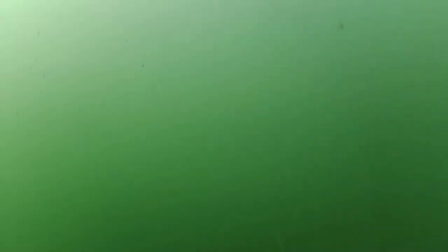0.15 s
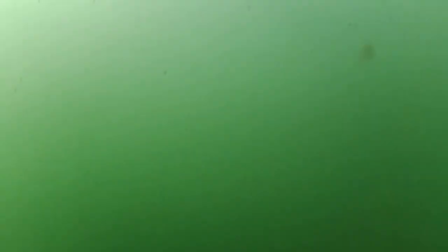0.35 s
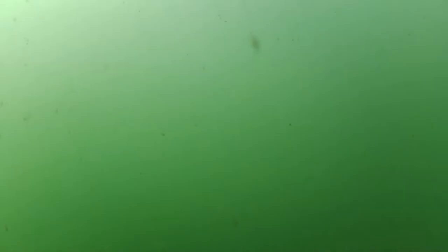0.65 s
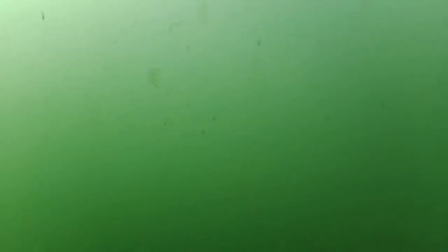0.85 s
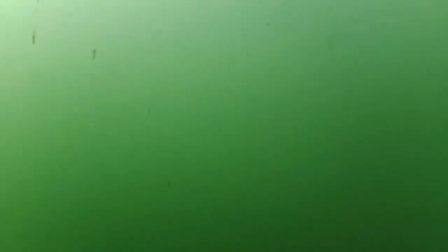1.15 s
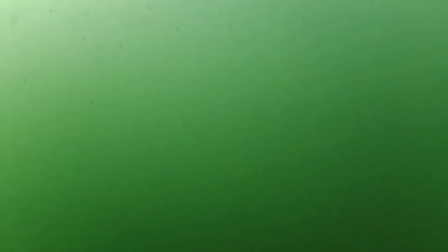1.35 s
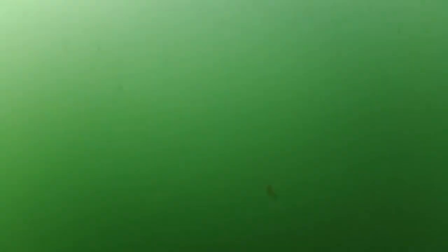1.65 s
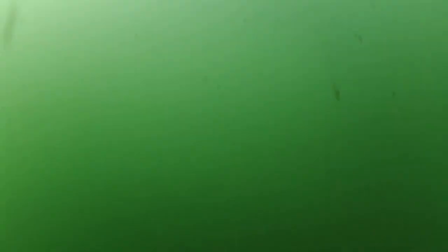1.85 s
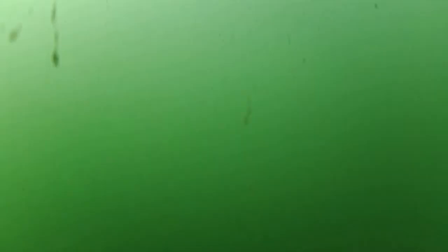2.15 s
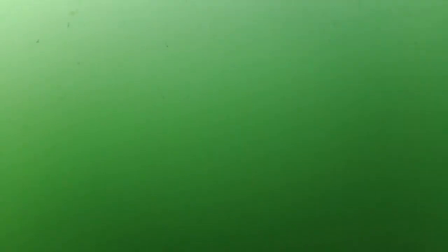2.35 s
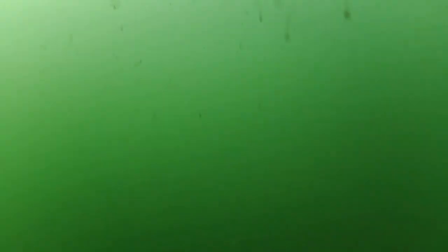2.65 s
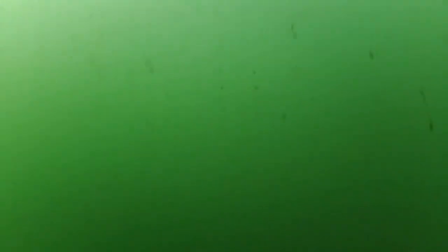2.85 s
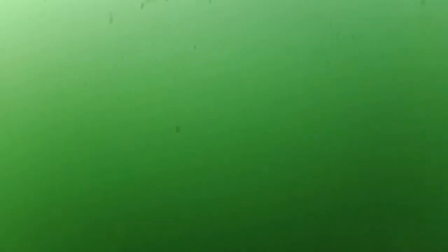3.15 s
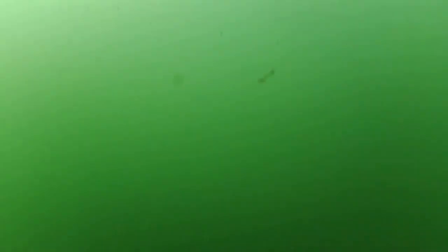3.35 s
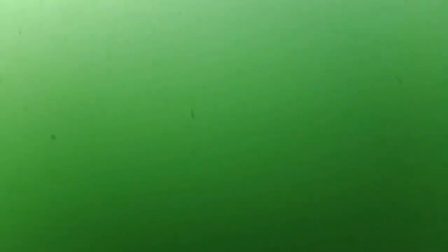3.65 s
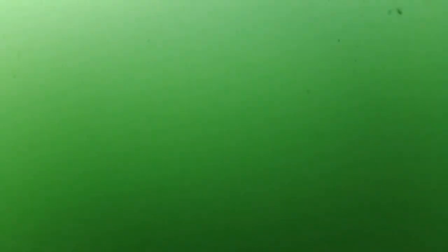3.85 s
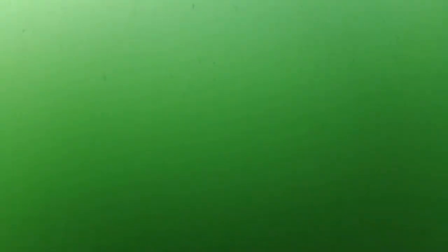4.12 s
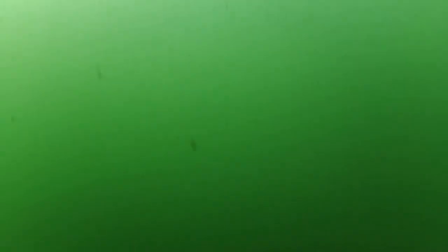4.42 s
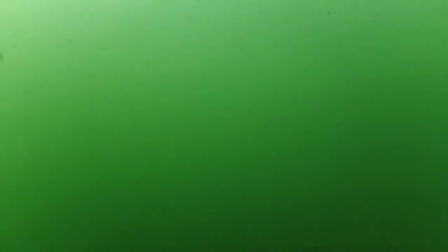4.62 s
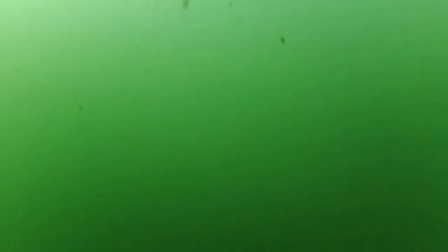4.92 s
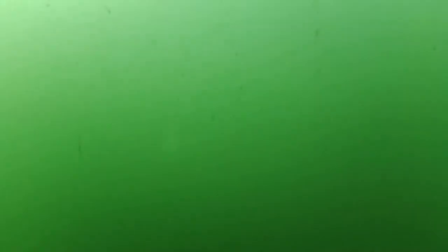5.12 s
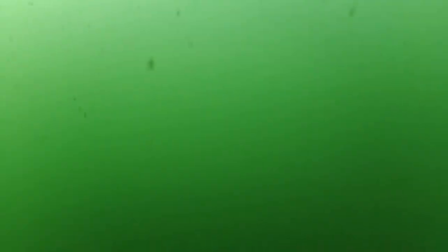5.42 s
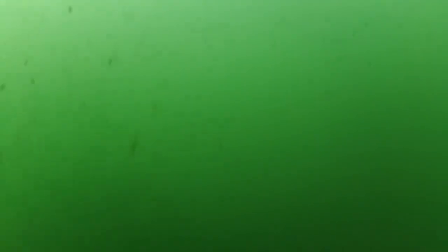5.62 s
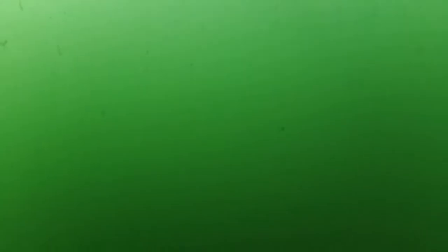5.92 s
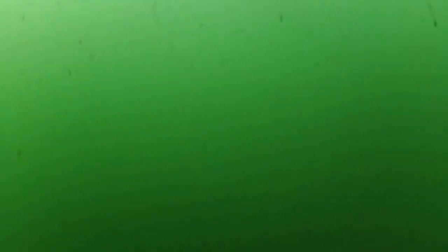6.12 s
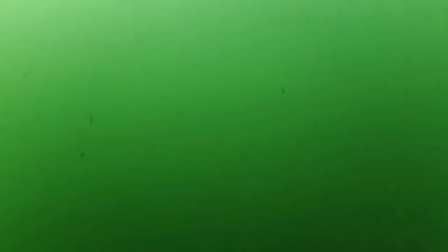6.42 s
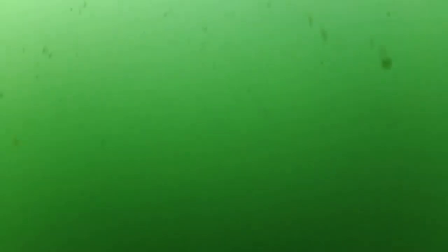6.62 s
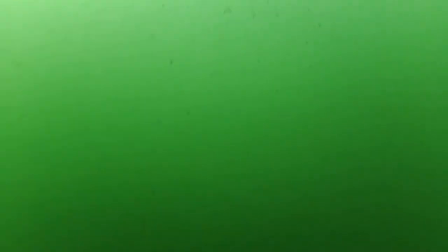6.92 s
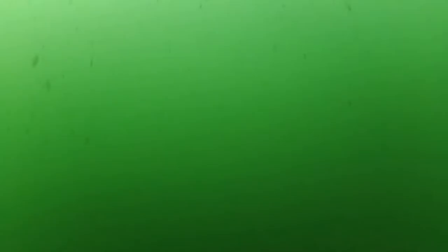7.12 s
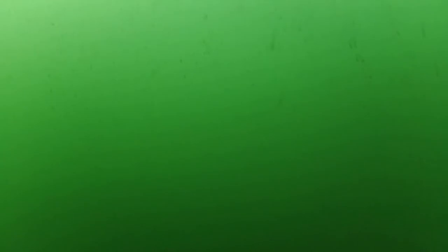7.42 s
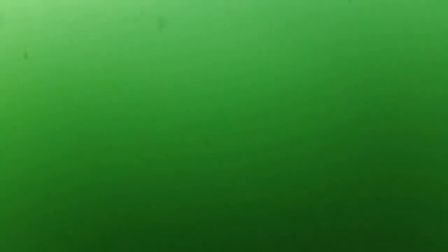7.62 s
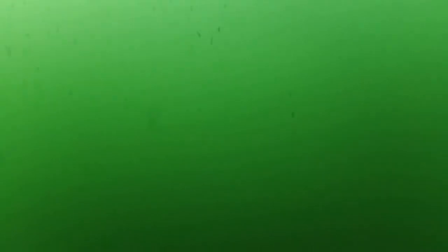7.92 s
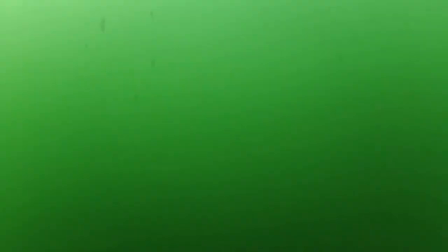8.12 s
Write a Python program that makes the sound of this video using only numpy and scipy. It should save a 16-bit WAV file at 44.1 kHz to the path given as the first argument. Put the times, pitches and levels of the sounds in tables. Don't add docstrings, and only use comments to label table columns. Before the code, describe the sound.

Underwater, a muffled motor hum and a faint wavering whistle give way to dense hollow knocking and rattling of a towed plastic housing.

```python
import sys
import numpy as np
from scipy import signal
from scipy.fft import rfft, irfft, next_fast_len
from scipy.io import wavfile
from scipy.ndimage import uniform_filter1d, map_coordinates

SR = 44100
rng = np.random.default_rng(int(sys.argv[2]) if len(sys.argv) > 2 else 0)


def magnitude_from_level(level_db):
    exponent = np.asarray(level_db, float) / 20
    return 10 ** exponent


def log_audio(samples):
    frames = np.atleast_2d(samples).T
    limited = np.clip(frames, -1, 1)
    pcm = np.round(limited * 32767).astype(np.int16)
    wavfile.write(sys.argv[1], SR, pcm)


N = 364521
TIME = np.arange(N) / SR


def unit(x):
    return x / np.sqrt(np.mean(x ** 2) + 1e-20)


def noise():
    return rng.standard_normal(N)


def wobble(rate):
    return map_coordinates(rng.standard_normal(int(N * rate / SR) + 4), [TIME * rate])


def curves(rows):
    s, *columns = np.transpose(rows)
    gate = np.clip(np.minimum(TIME - s[0], s[-1] - TIME) / .02 + 1, 0, 1)
    return [np.interp(TIME, s, column) for column in columns] + [gate]


def filtered(x, response):
    m = next_fast_len(N + SR // 2)
    return irfft(rfft(x, m) * response(np.fft.rfftfreq(m, 1 / SR)), m)[:N]


def ringing(x, modes, soft_hz, order=2):
    def response(f):
        body = 0
        for k, (center, width, db) in enumerate(modes):
            damping = 1j * f * width
            body = body + (-1) ** k * magnitude_from_level(db) * damping / (center * center - f * f + damping)
        return body / (1 + 1j * f / soft_hz) ** order
    impulse = np.arange(N) == 0
    return filtered(x, response) / np.max(np.abs(filtered(impulse, response)))


def blow_train(at, sizes):
    return np.bincount(at, sizes, N)[:N]


# frequency in Hz, density in dB per Hz.
HISS_SPECTRUM = [(300, 5.5), (5000, -7.5), (9000, -3), (15000, -4)]


def hiss():
    f, db = np.transpose(HISS_SPECTRUM)
    return unit(filtered(noise(), lambda hz: magnitude_from_level(np.interp(np.log(hz + 1), np.log(f), db))))


TURN_S = 5
# frequency in Hz, width in Hz, level in dB.
LATE_EDGES = [(1367, 52, -1.5), (1634, 160, -3), (1976, 38, -3), (2380, 39, -11.5), (3000, 250, -32.5),
              (3840, 300, -23), (4800, 440, -37), (5280, 110, -36), (6250, 220, -37), (7600, 500, -41)]


def edges(x, early):
    late = np.clip((TIME - TURN_S) / 0.12, 0, 1)
    before = ringing(x * (1 - late), early, soft_hz=4050)
    return before + magnitude_from_level(-4.5) * ringing(x * late, LATE_EDGES, soft_hz=4030)


# frequency in Hz, width in Hz, level in dB.
SHELL_MODES = [(88.6, 33, -19), (133.6, 21, -12.5), (153.7, 15, -5.5)]
# frequency in Hz, width in Hz, level in dB.
LID_MODE = [(338.6, 23.7, 0)]
# frequency in Hz, width in Hz, level in dB.
PANEL_MODES = [(588.6, 34.9, -1), (656, 51, -3), (792, 174, -14), (963.3, 80, -4.5), (1014.5, 103, -7)]
# frequency in Hz, width in Hz, level in dB.
ENGINE_WHINE = [(648, 22, -1.5), (983, 11, -0.5), (1343, 10, -15)]
# frequency in Hz, width in Hz, level in dB.
FLOW_EDGES = [(1274, 36, -8), (1855, 170, -5), (2240, 160, -10.5), (2800, 160, -14), (3400, 98, -15.5),
              (3770, 160, -17.5), (4700, 310, -16.5), (7400, 400, -38)]
# frequency in Hz, width in Hz, level in dB.
LATE_FLOW = [(2880, 150, -3), (3800, 130, -0.5), (5300, 160, -5), (6250, 200, -6), (7500, 250, -9.5)]
# time in seconds, level in dB, share of the shell in dB.
HUM_COURSE = [
    (0.0, -39, 2),
    (0.44, -42.5, 6),
    (2.71, -41, 1),
    (2.92, -48.5, 2.5),
    (4.21, -40.5, 0),
    (4.63, -53, -1),
    (4.83, -36.5, -4),
    (6.1, -40.5, 4),
    (6.95, -39, -4.5),
    (8.27, -41, -3),
]


def hum():
    def drive():
        return magnitude_from_level(2.5 * wobble(14) + 1.5 * wobble(45)) * noise()

    level_db, shell_db, _ = curves(HUM_COURSE)
    low = magnitude_from_level(-6) * unit(ringing(drive(), SHELL_MODES, soft_hz=400))
    low += magnitude_from_level(-9.5) * unit(ringing(drive(), LID_MODE, soft_hz=443))
    panels = magnitude_from_level(-2.5) * unit(ringing(drive(), PANEL_MODES, soft_hz=4000))
    panels += magnitude_from_level(-2) * unit(ringing(drive(), PANEL_MODES[2:], soft_hz=2900))
    whine = unit(ringing(noise(), ENGINE_WHINE, soft_hz=4000))
    panels += magnitude_from_level(-3.5 + 1.9 * wobble(8.8)) * whine
    flow = magnitude_from_level(-58.0) * unit(edges(magnitude_from_level(0.6 * wobble(22)) * noise(), FLOW_EDGES))
    flow += magnitude_from_level(-77) * (TIME > TURN_S) * unit(ringing(noise(), LATE_FLOW, soft_hz=9000))
    return magnitude_from_level(level_db + 1.1 * wobble(2.7)) * (magnitude_from_level(shell_db) * low + panels) + flow


# time in seconds, pitch in Hz.
LINE_GUSTS = [
    [(0, 1050), (.1, 1090), (.25, 730), (.35, 720), (.44, 630), (.6, 600), (.66, 830), (.78, 810),
     (.9, 620)],
    [(.93, 680), (.98, 890), (1.08, 1010), (1.14, 940), (1.5, 990), (1.61, 1170), (1.74, 930), (2.06, 940),
     (2.26, 560)],
    [(5.45, 860), (5.53, 1020), (5.6, 990), (5.66, 970), (5.7, 810), (5.735, 960), (5.79, 900), (5.83, 700),
     (5.93, 560)],
]


def tow_line():
    flutter_hz, flutter_share = 12, .045

    def fuzzy(phase):
        return (.7 + .9 * wobble(75)) * np.sin(phase) + .9 * wobble(90) * np.cos(phase)

    def lift(modes):
        return lambda f: sum(magnitude_from_level(db / 2) * w / np.hypot(f - c, w) for c, w, db in modes)

    tone, octave = np.zeros((2, N))
    for rows in LINE_GUSTS:
        hz, gate = curves(rows)
        flutter = flutter_share * np.sin(2 * np.pi * flutter_hz * TIME + wobble(3))
        bend = 1 + .014 * wobble(70) + .02 * wobble(22) + flutter
        phase = 2 * np.pi * np.cumsum(hz * bend) / SR
        tone += gate * fuzzy(phase)
        octave += gate * fuzzy(2 * phase)
    lifted_octave = filtered(octave, lift([(1380, 150, 2), FLOW_EDGES[1]]))
    return magnitude_from_level(-53) * filtered(tone, lift(PANEL_MODES)) + magnitude_from_level(-59.5) * (.7 * octave + lifted_octave)


# start in seconds, peak in dB, pitch in Hz.
MOUNT_TICKS = [
    (1.4513, -47, 7700),
    (2.601, -42, 6330),
    (5.2465, -57, 6050),
    (5.5586, -45, 7640),
    (5.5725, -41, 8200),
    (6.8629, -41, 6300),
]


def ticks():
    out, t = np.zeros(N + SR), np.arange(SR // 50) / SR
    for s, db, hz in MOUNT_TICKS:
        envelope = (1 - np.exp(-t / 0.00065)) * magnitude_from_level(-60 * t / 0.019)
        puff = envelope * rng.standard_normal(len(t))

        def band(center, width):
            return signal.lfilter(*signal.iirpeak(center, center / width, SR), puff)

        snap = band(hz, 900) + 0.61 * band(5000, 1500) + .9 * band(3500, 1200) + 0.14 * band(9500, 3700)
        out[round(s * SR):][:len(t)] += magnitude_from_level(db - 0.5) * snap / np.max(np.abs(snap))
    return out[:N]


FULL_SHAKE_DB = -20
# frequency in Hz, width in Hz, level in dB.
EDGE_MODES = [(1316, 24, 1), (1646, 220, -6), (2003, 93, -2.5), (2327, 54, -7.5), (3060, 280, -24),
              (3880, 130, -18.5), (4600, 270, -32), (6040, 300, -40.5)]
# time in seconds, level in dB.
SHAKE = [(2.22, -39), (2.3, -25.5), (2.65, -23), (2.68, -39), (2.74, -19.5), (4.41, -19), (4.47, -33),
         (4.65, -37), (4.68, -16.5), (5.03, -22), (5.31, -31), (5.42, -51.5), (5.72, -44), (6.27, -37.5),
         (6.48, -23.5), (7.33, -20.5), (7.93, -26.5), (8.27, -24)]


def rattle():
    shake_db, gate = curves(SHAKE)
    contact = rng.random(N) < 240 / SR * magnitude_from_level(5 * wobble(35))
    size = contact * magnitude_from_level(4.5 * noise())

    def blows():
        return size * rng.choice([-1, 1], N) * magnitude_from_level(0.87 * noise())

    body = magnitude_from_level(1.5) * unit(ringing(blows(), LID_MODE, soft_hz=690, order=4))
    body += magnitude_from_level(-0.5) * unit(ringing(blows(), PANEL_MODES, soft_hz=1840, order=5))
    body += magnitude_from_level(1.5) * unit(ringing(blows(), SHELL_MODES, soft_hz=257))
    scrape = unit(blows()) + 0.32 * magnitude_from_level(7 * wobble(50)) * noise()
    grit_db = -19.5 + 0.2 * (shake_db - FULL_SHAKE_DB)
    grit = magnitude_from_level(grit_db - 3.5) * unit(edges(scrape, EDGE_MODES))
    return gate * magnitude_from_level(shake_db - 4.5) * (body + grit)


AFTER_CONTACTS = 9
# start in seconds, shell level in dB, panel level in dB, brightness in dB.
STRAYS = [(0.048, -29, -20, -14), (0.363, -16.5, -6.5, -3.5), (1.459, -28, -17, 3.5),
          (2.623, -15, -11.5, 1), (4.611, -5.5, -16.5, -1), (5.277, -20, -17.5, 1), (5.336, -13, -12, 0.5),
          (5.762, -27, -16.5, 0.5), (5.852, -20, -16.5, 3.5), (5.879, -17.5, -15.5, -1.5),
          (5.943, -19, -13.5, 3.5), (5.99, -24.5, -11, 0.5), (6.102, -23, -15.5, 0.5),
          (6.222, -20.5, -17, 4), (8.253, -16, -12.5, -4), (6.244, -12.5, -12, 1)]
# start in seconds, shell level in
# dB, panel level in dB, brightness in dB.
LEADING_BLOWS = [(2.268, -15.5, -14.5, 2), (2.358, -11.5, -18, -3), (2.406, -11, -13.5, 2.5),
                 (2.498, -11, -10.5, -2), (2.543, -10.5, -7, -4), (2.718, -6, -13.5, -9.5),
                 (2.768, -8.5, -9.5, 2), (2.865, -14.5, -8.5, 3.5), (2.982, -6.5, -9, 4),
                 (3.094, -7, -10.5, 1), (3.14, -14, -10, -3), (3.209, -16.5, -15, -1.5), (3.332, -6, -19, -1),
                 (3.411, -8, -9.5, 3), (3.459, -16, -9, 1.5), (3.537, -5.5, -8, -2), (3.656, -4.5, -10, -3),
                 (3.762, -12.5, -14, -1), (3.913, -8, -12.5, 2.5), (4.008, -6.5, -9.5, -1.5),
                 (4.122, -5.5, -11.5, -1.5), (4.251, -3.5, -13.5, -6), (4.343, -12, -10.5, -1),
                 (4.434, -7.5, -10.5, 1.5), (4.547, -8.5, -7, -2.5), (4.671, -19, -11, 0.5),
                 (4.808, -3, -12, -3.5), (4.917, -8.5, -12, 3.5), (5.066, -9.5, -10, 1),
                 (5.14, -12, -11, 1.5),
                 (6.337, -8, -10.5, 1), (6.42, -21, -11.5, 2.5), (6.464, -21, -14.5, 4),
                (6.54, -12.5, -14.5, 1.5), (6.619, -10, -13.5, 1), (6.662, -5, -12.5, 3),
                (6.802, -6.5, -9, 3), (6.885, -7, -10.5, 0.5), (6.935, -17, -13, 2), (6.992, -9.5, -10, 2),
                (7.08, -17.5, -12, -2.5), (7.15, -10, -10, 3), (7.188, -7.5, -10, 0),
                (7.218, -5.5, -10, 2.5), (7.249, -11.5, -8.5, 2), (7.275, -8, -11.5, 2.5),
                (7.363, -1.5, -11, 0.5), (7.41, -8, -6, -1.5), (7.462, -8.5, -8.5, 1),
                (7.559, -15, -21, -6), (7.601, -6, -11.5, 0.5), (7.683, -8, -12.5, -2),
                (7.706, -4.5, -12.5, 0), (7.817, -7, -10.5, -0.5), (7.937, -7.5, -13.5, -1.5),
                (8.01, -12.5, -22, -2.5), (8.067, -9, -10, -3.5), (8.121, -8, -11, -1),
                (8.158, -19, -13.5, -1), (8.207, -11, -16.5, 2.5)]


def contacts():
    rebound_s, spread = .047, .3
    shell_loss_db, panel_loss_db = 5.5, 3.5
    s, shell_db, panel_db, bright_db = np.transpose(LEADING_BLOWS)[..., None]
    turns = np.arange(3)
    order = np.sort(np.append(s, [row[0] for row in STRAYS] + [N / SR]))
    ahead = order[np.searchsorted(order, s, "right")]
    chance = rng.standard_normal((len(s), 8, len(turns)))
    at = s + rebound_s * turns * (1 + spread * np.tanh(chance[:, 0]) / 2)
    free = (at < ahead - rebound_s / 2) | (turns == 0)
    scatter = (turns > 0) * np.tanh(chance[:, 1:4])
    rows = np.stack([at,
                     shell_db - shell_loss_db * turns + 1.5 * scatter[:, 0],
                     panel_db - panel_loss_db * turns + 1.5 * scatter[:, 1],
                     bright_db + 2.5 * scatter[:, 2],
                     *np.moveaxis(chance[:, 4:], 1, 0)], -1)
    seed_count = 6 * AFTER_CONTACTS
    seeds = rng.random((len(s), len(turns), seed_count))
    spells = np.concatenate([rows, seeds], -1)[free]
    stray_chance = rng.standard_normal((len(STRAYS), 4))
    strays = np.hstack([STRAYS, stray_chance, rng.random((len(STRAYS), seed_count))])
    rows = np.vstack([spells, strays])
    return rows[np.argsort(rows[:, 0])]


def shell(rows):
    lag_s, t60_s = -0.0022, 0.42
    s, db, chance = rows[:, 0] + lag_s, rows[:, 1], rows[:, 4:8]
    last = np.clip(np.searchsorted(s, TIME) - 1, 0, None)
    age = TIME - s[last]
    size = (age > 0) * magnitude_from_level(db[last] - 60 * age / t60_s)
    shell_hz = SHELL_MODES[-1][0]
    hz = shell_hz + 2.5 * chance[last, 0] + 1.95 * wobble(30)
    phase = 2 * np.pi * np.cumsum(hz) / SR + 1.2 * chance[last, 1]

    def settle(v):
        return uniform_filter1d(v, round(.011 * SR))

    carrier = 2 * np.pi * shell_hz * TIME
    swing = settle(size * np.cos(phase - carrier)) * np.cos(carrier)
    swing -= settle(size * np.sin(phase - carrier)) * np.sin(carrier)
    thump_db = db - 19.5 + 5.5 * np.tanh(chance[:, 2]) - .8 * rows[:, 3]
    push = blow_train(np.round(s * SR).astype(int), magnitude_from_level(thump_db) * np.sign(chance[:, 1]))
    return swing + magnitude_from_level(6.0) * ringing(push, SHELL_MODES[:2], soft_hz=200, order=4)


def jolts(rows):
    s, db, bright_db = rows[:, 0], rows[:, 2], rows[:, 3]
    shake_db = np.interp(s + 0.033, *np.transpose(SHAKE))
    upper_db = -6 + bright_db
    hard_db = -23.5 + 0.29 * np.clip(shake_db - FULL_SHAKE_DB, -18, 0) + bright_db + 3 * np.tanh(rows[:, 7])
    chance = rows[:, 8:].reshape(len(s), 6, AFTER_CONTACTS)
    after = np.arange(AFTER_CONTACTS) > 0
    lag = (0.00408 + .022 * chance[:, 0]) * after
    at = np.round((s[:, None] + lag) * SR).astype(int).ravel()
    size = magnitude_from_level(-7 * after - 340 * lag) * np.sign(chance[:, 1] - .5)

    def blows(level_db, k):
        return blow_train(at, (magnitude_from_level(level_db[:, None] - 9.1 * chance[:, k] * after) * size).ravel())

    lid_db = db + 10 * np.log10(np.clip(1 - magnitude_from_level(2 * upper_db), .15, 1))
    out = magnitude_from_level(-2.5) * ringing(blows(lid_db, 2), LID_MODE, soft_hz=770, order=4)
    out += magnitude_from_level(2.07) * ringing(blows(db + upper_db, 3), PANEL_MODES, soft_hz=1780, order=5)
    scuff = np.hanning(round(0.0073 * SR))
    grit = signal.fftconvolve(np.abs(blows(db + hard_db, 4)), scuff, "same") * noise()
    return out + magnitude_from_level(-13.5) * edges(grit, EDGE_MODES)


# frequency in Hz, width in Hz, level in dB.
NOTCHES = [(224, 93, -9), (523, 33, -14.5), (2470, 44, -7.5), (4150, 410, -10), (5570, 870, -3)]


def cancelled(housing):
    def dips(f):
        product = 1
        for center, width, db in NOTCHES:
            stiff, damping = center * center - f * f, 1j * f * width
            product = product * (stiff + damping * magnitude_from_level(db)) / (stiff + damping)
        return product
    return filtered(housing, dips)


def scene():
    rows = contacts()
    housing = hum() + tow_line() + rattle() + shell(rows) + jolts(rows)
    return (cancelled(housing) + ticks())[None]


def top_cut(x):
    return signal.sosfilt(signal.butter(12, 15760, fs=SR, output="sos"), x)


def record(dry):
    rounded = dry / (1 + np.abs(dry / .75) ** 5) ** (1 / 5)
    mix = rounded + magnitude_from_level(-75) * hiss()
    return top_cut(mix)


dry = scene()
out = record(dry)
log_audio(out)
```